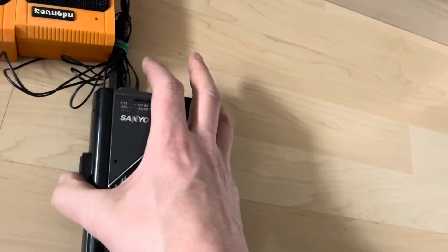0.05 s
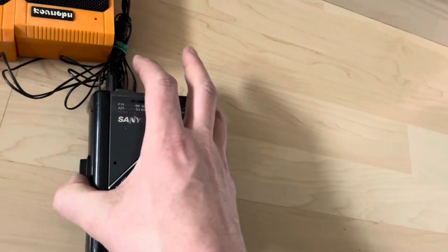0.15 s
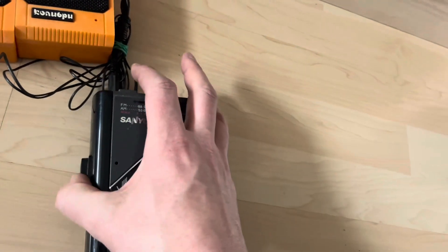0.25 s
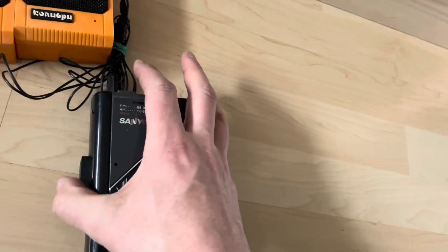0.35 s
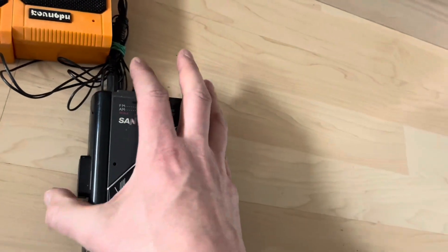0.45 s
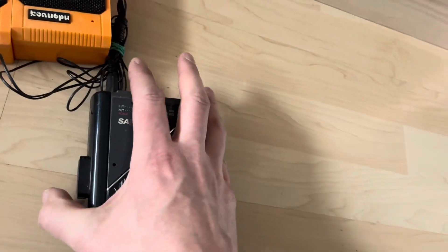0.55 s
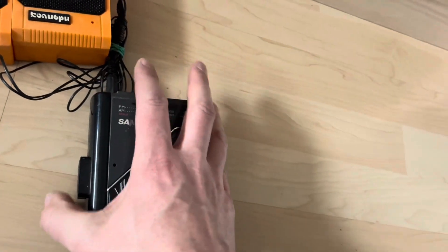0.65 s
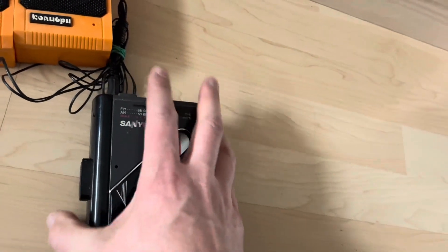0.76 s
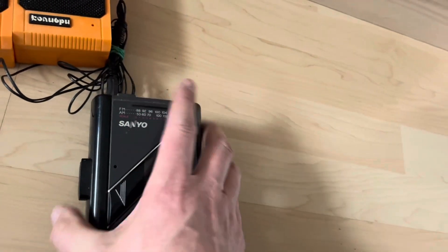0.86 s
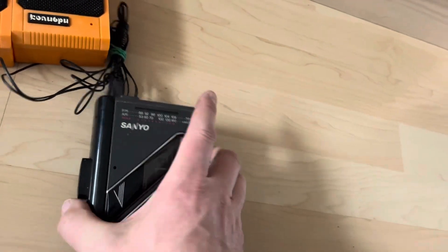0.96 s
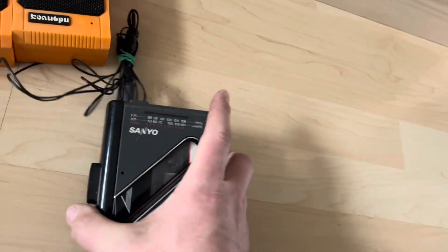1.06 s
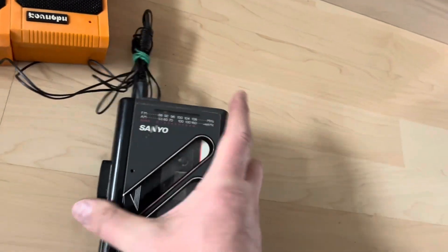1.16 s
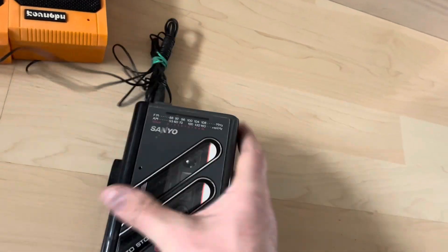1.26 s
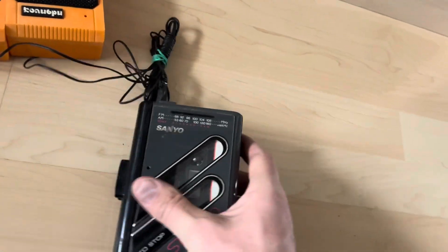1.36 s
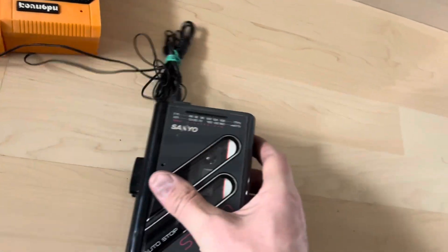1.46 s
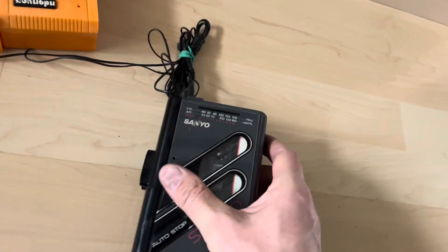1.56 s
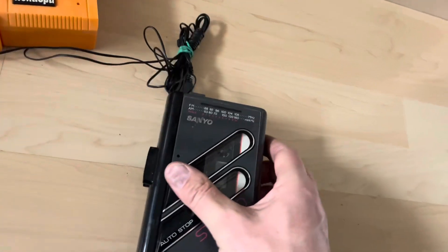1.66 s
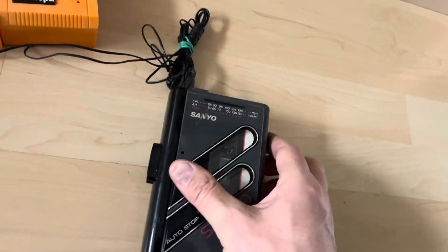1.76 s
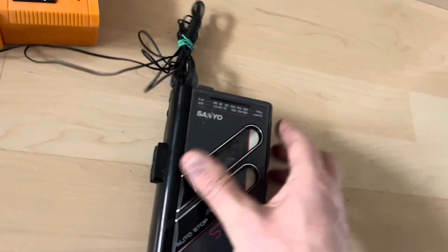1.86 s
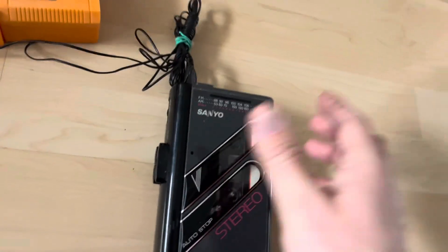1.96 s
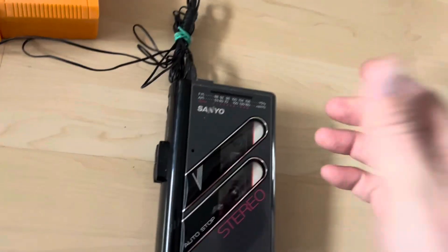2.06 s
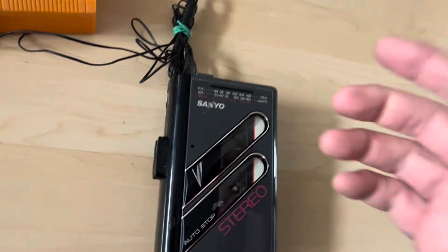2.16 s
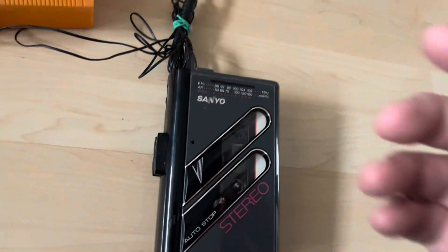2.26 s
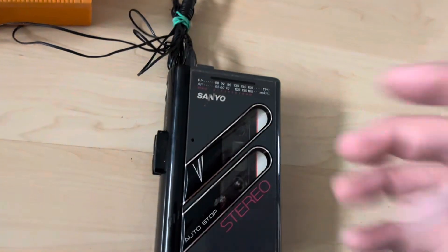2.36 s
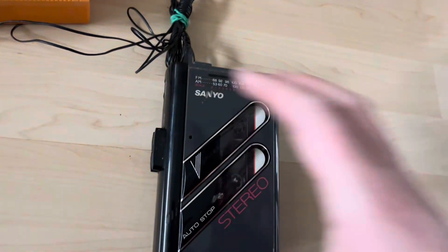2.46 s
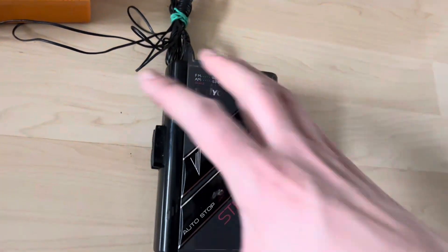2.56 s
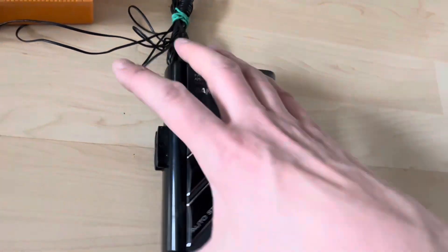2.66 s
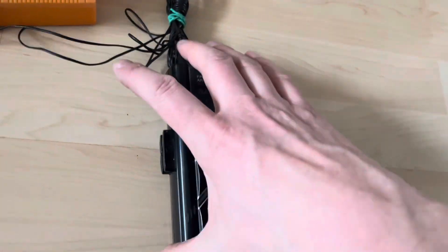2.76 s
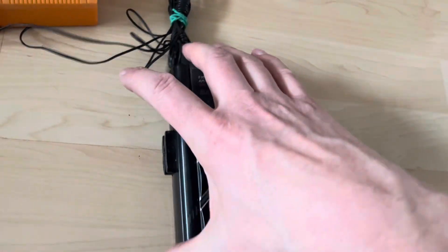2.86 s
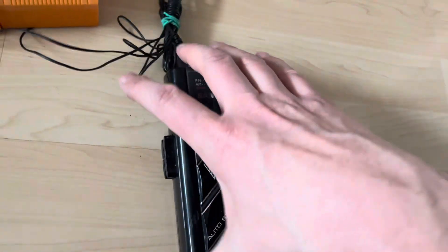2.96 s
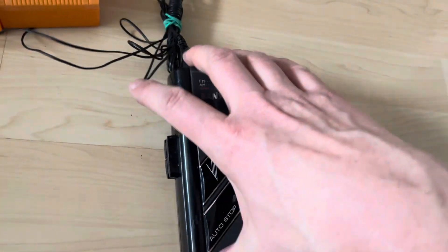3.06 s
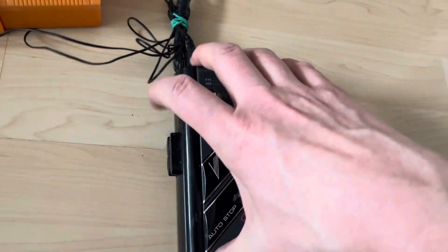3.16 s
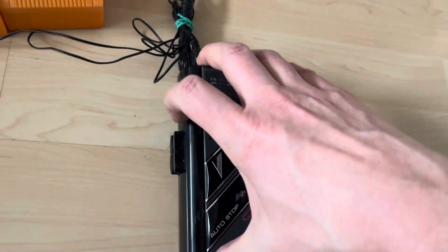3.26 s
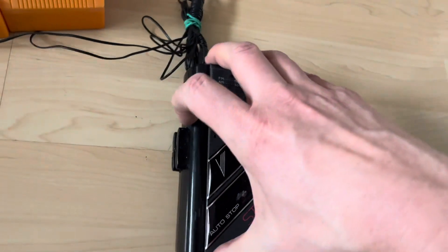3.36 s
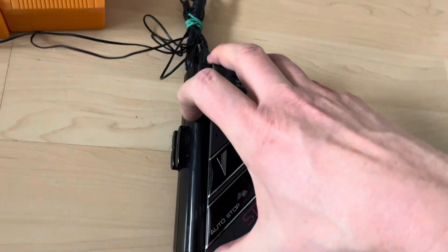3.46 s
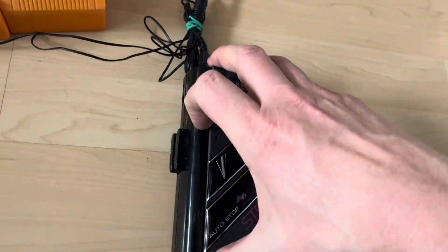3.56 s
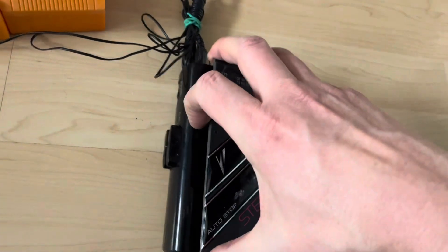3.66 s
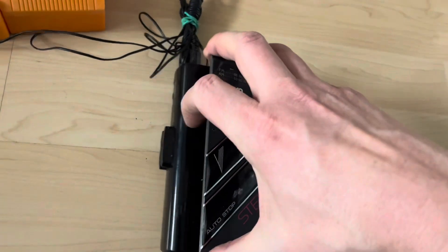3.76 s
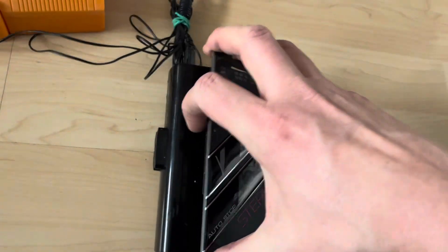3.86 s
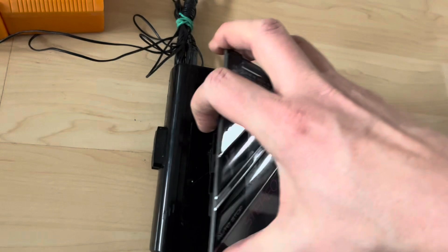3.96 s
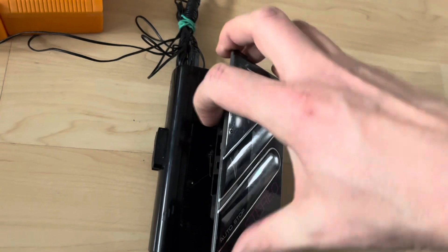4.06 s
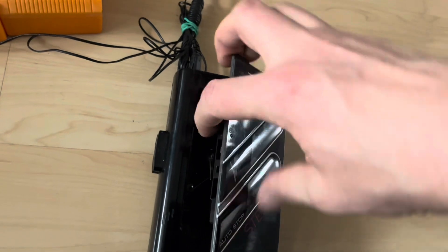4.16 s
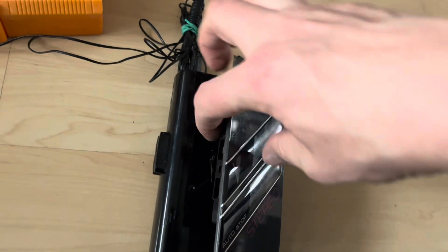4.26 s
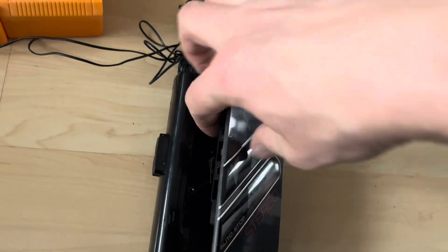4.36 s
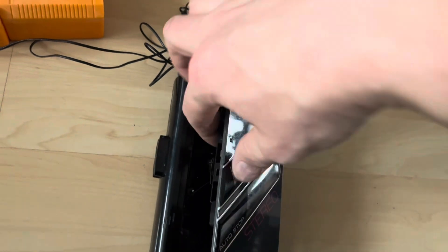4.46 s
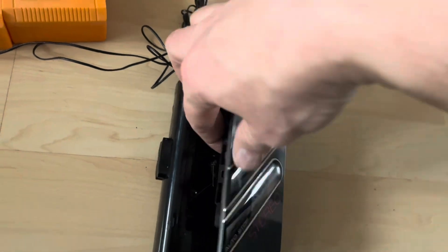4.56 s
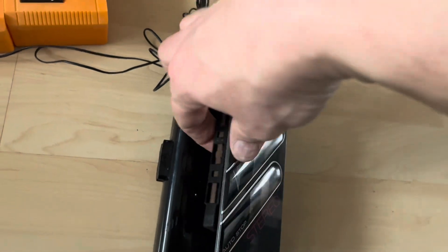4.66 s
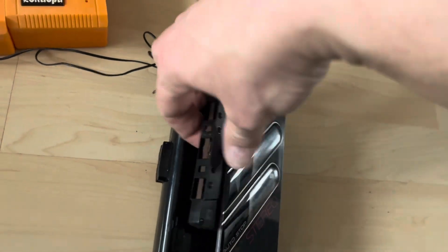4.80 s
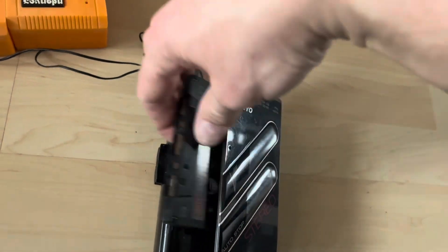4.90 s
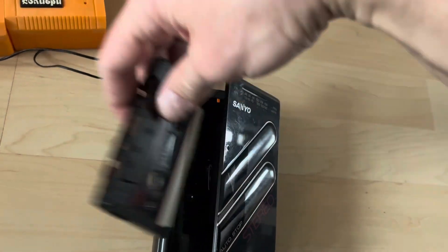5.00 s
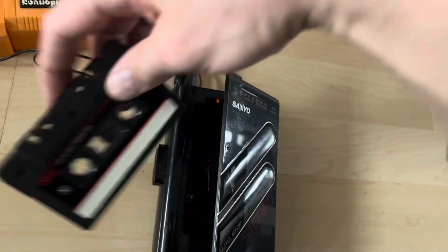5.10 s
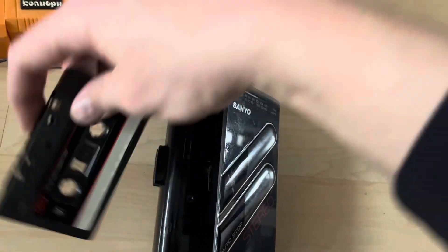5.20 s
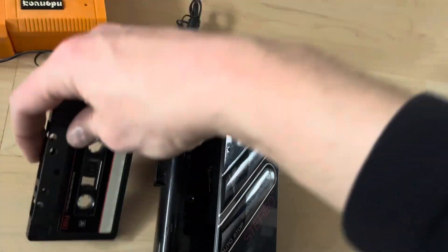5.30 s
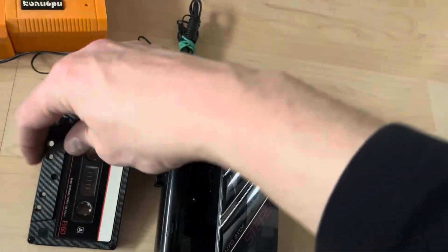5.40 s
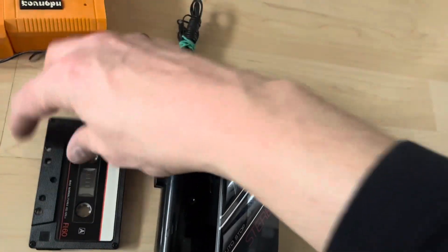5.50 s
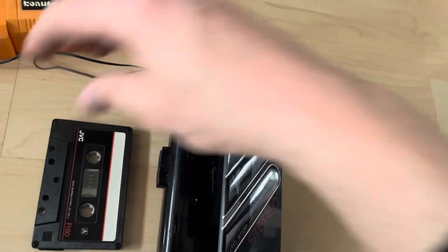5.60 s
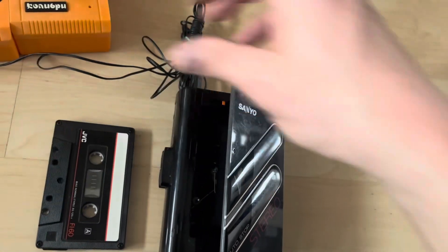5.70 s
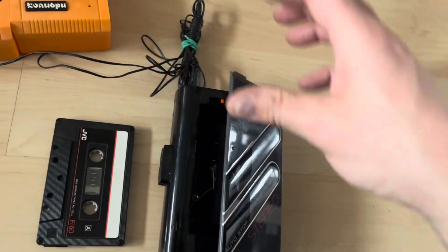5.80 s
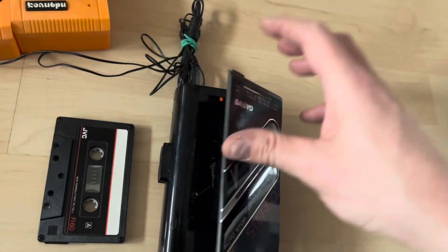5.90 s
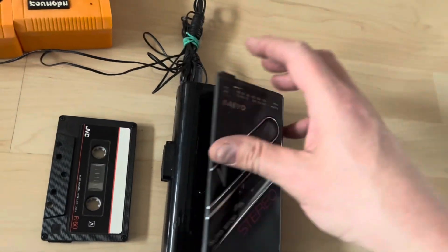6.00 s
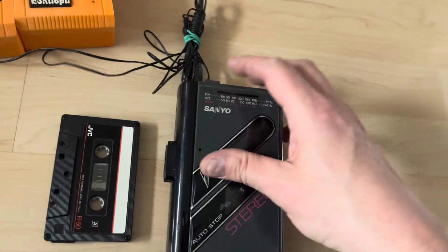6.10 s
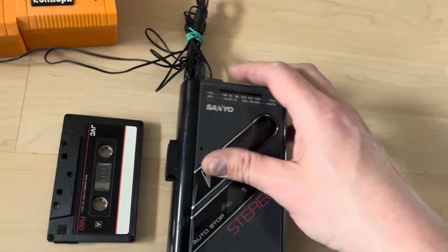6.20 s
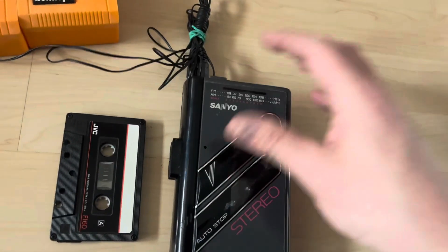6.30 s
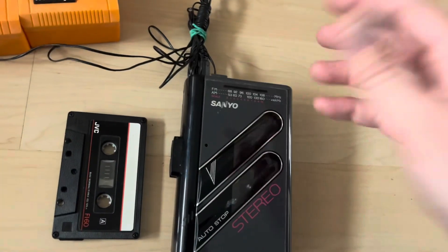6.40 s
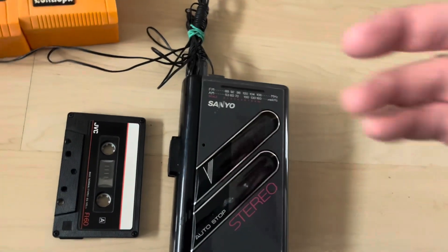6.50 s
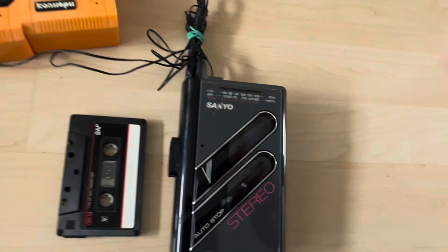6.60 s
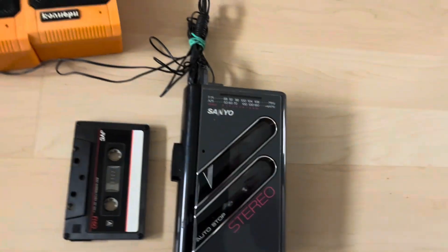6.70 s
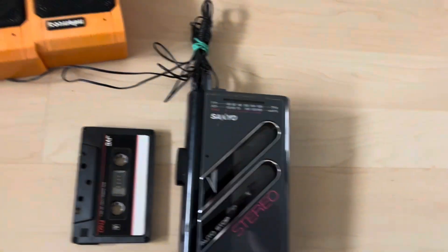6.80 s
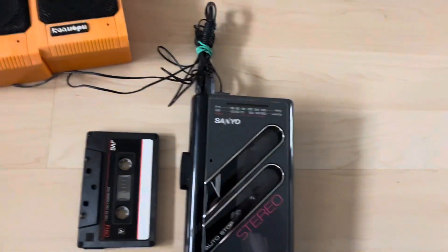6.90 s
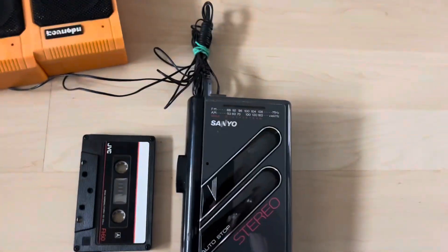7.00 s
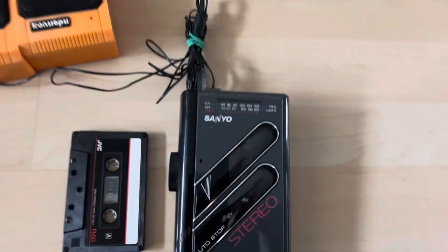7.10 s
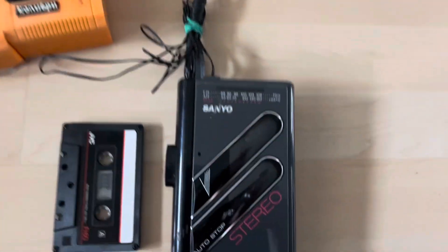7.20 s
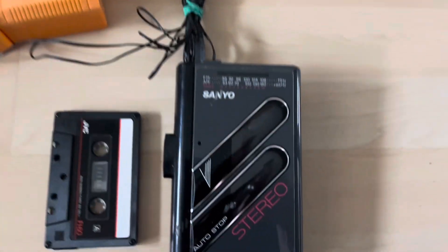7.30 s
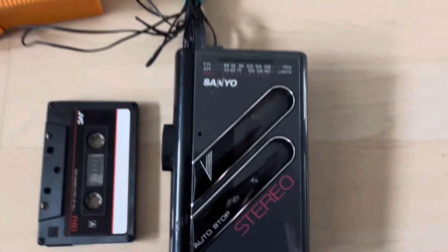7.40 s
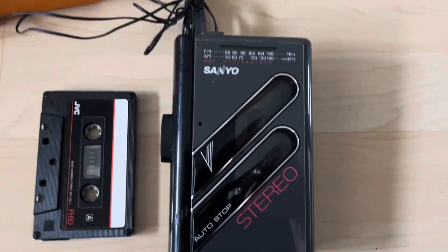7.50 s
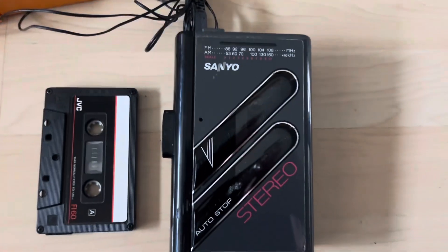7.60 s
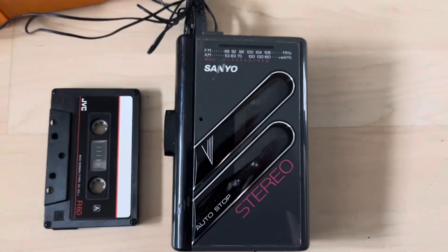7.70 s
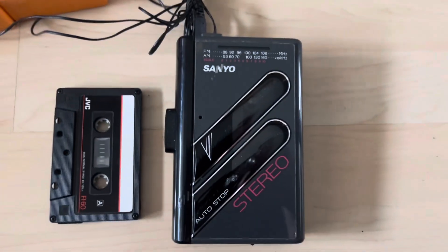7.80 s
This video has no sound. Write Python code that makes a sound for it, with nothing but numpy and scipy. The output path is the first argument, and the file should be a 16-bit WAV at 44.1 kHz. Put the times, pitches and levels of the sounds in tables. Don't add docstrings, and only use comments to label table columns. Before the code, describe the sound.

Hands work a portable cassette player on a floating floor: sparse clicks and short scuffs, soft skin rubbing, then a burst of rattling as the tape is pulled out. It lands with sharp clacks and a deep thump. The door slams loudest of all, settles with small knocks, and gives way to quiet handling rumble and sleeve rustle, heard by a hand-held phone with a short room tail.

```python
import sys
import numpy as np
from scipy import signal
from scipy.fft import rfft, irfft, next_fast_len
from scipy.io import wavfile
from scipy.ndimage import uniform_filter1d

SR = 44100
rng = np.random.default_rng(int(sys.argv[2]) if len(sys.argv) > 2 else 0)


def transcribe(u):
    v = np.clip(np.atleast_2d(u).T, -1, 1)
    q = np.round(v * 32767).astype(np.int16)
    wavfile.write(sys.argv[1], SR, q)


def linear_from_db(decibels):
    return 10 ** (np.asarray(decibels, float) / 20)


N = 346075


def along(table, hz):
    points = np.array(table)
    return np.interp(np.log(hz + 1), np.log(points[:, 0]), points[:, 1])


def colour(x, table):
    size = next_fast_len(len(x))
    gain = linear_from_db(along(table, np.fft.rfftfreq(size, 1 / SR)))
    y = irfft(rfft(x, size) * gain, size)[:len(x)]
    return y / np.sqrt(np.mean(y ** 2))


def noise(table):
    return colour(rng.standard_normal(N), table)


def narrow(hz, share, size):
    skirt = [(hz / 3, -90), (hz * (1 - 3 * share), -40), (hz * (1 - share), -6), (hz, 0),
             (hz * (1 + share), -6), (hz * (1 + 3 * share), -40), (hz * 3, -90)]
    return colour(rng.standard_normal(size), skirt)


def fade(t, t60):
    return np.exp(-np.log(1000) * t / max(t60, 1e-3))


def top(x):
    return x / np.abs(x).max()


def walk(rate):
    k = int(SR / rate)
    held = np.repeat(rng.standard_normal(N // k + 1), k)
    return 1.6 * uniform_filter1d(held, k)[:N]


def add(out, s, sound, early_s=0):
    i = max(int((s - early_s) * SR), 0)
    out[i:i + len(sound)] += sound[:len(out) - i]


def bell(half):
    return np.exp(-np.arange(-3, 3, 1 / SR / half) ** 2)


def swells(peaks):
    out, lead = np.zeros(N + SR), 1
    for s, db, half in peaks:
        add(out, s + lead, linear_from_db(db) * bell(half), early_s=3 * half)
    return out[SR:]


def ring(modes, t, chance, tilt_db=0):
    shift, spot_db = 1 + .02 * chance[:, 1], 2 * chance[:, 0]
    out = 0
    for (hz, db, t60), a, b in zip(modes, spot_db, shift):
        level = linear_from_db(db + a + tilt_db * np.log2(hz / modes[0][0]))
        out = out + level * fade(t, t60) * np.sin(2 * np.pi * hz * b * t)
    return out


# frequency in Hz, density in dB per Hz.
AIR_COLOUR = [(59, -20), (100, 2.5), (1000, -24), (1760, -12), (2470, -27.5), (5000, -40.5), (14100, -68),
              (16000, -75)]


def air():
    return linear_from_db(-68.5 + .7 * walk(4.7)) * noise(AIR_COLOUR)


# frequency in Hz, density in dB per Hz.
HISS_COLOUR = [(3000, -20), (6500, -2), (8000, 0), (12800, -1), (13600, -14), (16000, -30)]


def hiss():
    return linear_from_db(-96) * noise(HISS_COLOUR)


# peak in seconds, level in dB rms, half length in s, centre in
# Hz.
DRONES = [(7.8, -62, 0.07, 300), (7.5, -67, .06, 260), (.2, -68, .1, 600), (1.375, -67, 0.32, 323),
          (3.42, -69, 0.22, 273), (3.9, -70, 1.8, 540), (6.3, -70, 0.3, 520), (5.78, -66, .12, 300),
          (7.6, -64, .15, 190)]
# peak in seconds, level in dB rms, half length in s, centre in Hz.
WHIRS = [(7.42, -80, .1, 2440), (7.66, -74, .07, 1670), (7.54, -76, .04, 1710), (7.46, -73, .04, 1290),
         (7.63, -79, .08, 1250), (7.7, -82, .12, 2430), (7.62, -79, .06, 860), (7.2, -75, .04, 2140),
         (7.17, -77, .05, 1680), (7.27, -77, .05, 1280), (7.33, -78, .08, 1780), (7.77, -78, .04, 1610),
         (3.2, -76, .06, 3350)]
# peak in seconds, level in dB rms, half length in s, centre in Hz.
HINGE = (3.36, -62, .07, 1500)


def drones():
    out, lead = np.zeros(N + 12 * SR), 6
    for rows, share in ((DRONES + [HINGE], .07), (WHIRS, .008)):
        for s, db, half, hz in rows:
            shape = bell(half)
            add(out, s + lead, linear_from_db(db) * shape * narrow(hz, share, len(shape)), early_s=3 * half)
    return out[lead * SR:lead * SR + N]


# time in seconds, level in dB rms.
JERKS = [(0.221, -61), (.88, -60), (1.1, -60), (1.33, -57), (1.87, -51.5), (2.22, -67.5), (2.641, -62.5),
         (2.86, -66), (3.08, -56), (3.57, -56.5), (3.96, -53), (4.18, -62.5), (4.4, -67), (4.73, -56),
         (4.95, -59), (5.281, -63), (5.5, -54), (6.2, -70), (6.419, -51), (6.62, -57.5), (6.801, -55),
         (7.04, -64), (7.481, -61.5), (7.65, -54)]


def handling():
    rumble = noise([(20, -14), (55, 6), (90, 2), (140, -8.5), (300, -17), (500, -64.5)])
    jerk_s, hold_db = 0.094, -65.5
    level = swells((s, db, jerk_s) for s, db in JERKS) + linear_from_db(hold_db)
    return rumble * linear_from_db(1.2 * walk(14)) * level


# time in seconds, peak in dB, pitch in Hz.
GRIP_KNOCKS = [(6.427, -45, 297), (6.493, -50, 260), (6.512, -45, 264), (6.536, -48, 270),
               (6.551, -43, 330), (6.563, -49, 270), (6.609, -47, 325.6), (6.631, -47.5, 411),
               (6.676, -47, 293), (6.701, -42, 272), (6.785, -52, 280), (6.742, -51.5, 289),
               (6.804, -47, 300), (6.875, -51.5, 367), (7.515, -57.5, 648), (7.725, -47.5, 636),
               (7.753, -45.5, 566), (7.775, -40, 545), (7.827, -38, 617)]


def grip():
    out, t = np.zeros(N), np.arange(1000) / SR
    bent = t + .0015 * (1 - fade(t, .014))
    shape = (1 - fade(t, .006)) * fade(t, .013)
    for s, db, hz in GRIP_KNOCKS:
        lower = np.sin(2 * np.pi * hz * bent)
        upper = 270 / hz * np.sin(2 * np.pi * 2.3 * hz * t)
        add(out, s - .001, linear_from_db(db + 6) * shape * (lower + upper))
    return out


# peak in seconds, level in dB rms, half length in s.
SLEEVE_SHIFTS = [
    (7.055, -49, 0.026),
    (7.125, -58, 0.016),
    (7.26, -66.5, 0.084),
    (7.455, -62.5, 0.033),
    (7.62, -70, 0.35),
]
# frequency in Hz, density in dB per Hz.
CLOTH = [(250, -11.5), (650, 9), (1000, -24), (1280, 2), (1480, -19.5), (1720, -2.5), (2300, -12.5),
         (3300, -57)]


def sleeve():
    grains = rng.standard_normal(N) * linear_from_db(2.6 * walk(170))
    return colour(grains, CLOTH) * swells(SLEEVE_SHIFTS)


# peak in seconds, drag on the floor in dB, skin hiss in dB, half length in s.
STROKES = [(0.041, -48.5, -68, 0.12), (0.33, -53.5, -86, 0.098), (0.758, -74.5, -65, 0.11),
           (0.915, -53, -63, 0.081), (1.12, -58.5, -61, 0.091), (1.232, -51, -58, 0.042),
           (1.392, -60.5, -68, 0.12), (1.519, -58.5, -65, 0.058), (1.876, -58.5, -64, 0.056),
           (2.105, -103, -69, 0.28), (2.45, -104, -72, 0.069), (2.725, -57.5, -66, 0.066),
           (3.021, -56.5, -68.5, 0.16), (3.373, -60, -68, 0.13), (3.632, -52.5, -65, 0.08),
           (3.806, -59, -61.5, 0.14), (4.11, -64, -66, 0.16), (4.394, -63.5, -65.5, 0.045),
           (4.654, -41.5, -48, 0.052), (4.814, -48.5, -49, 0.082), (5.072, -61.5, -58.5, 0.14),
           (5.357, -57, -69, 0.073), (5.567, -54, -72.5, 0.087), (5.796, -72.5, -95, 0.16),
           (6.085, -46, -55.5, 0.051), (6.358, -65.5, -68.5, 0.056), (6.568, -70.5, -66.5, 0.17),
           (6.85, -74, -78.5, 0.12), (7.075, -65, -76, 0.07)]
# frequency in Hz, density in dB per Hz.
SKIN = [(1200, -23), (2000, -4), (4400, -2), (6500, -5.5), (10500, -11), (15000, -17), (16000, -51.5)]


def skin():
    waver = linear_from_db(2 * walk(14) + 1.5 * walk(60))
    return noise(SKIN) * waver * swells((s, db, half) for s, _, db, half in STROKES)


def drag_level():
    return swells((s, db, half) for s, db, _, half in STROKES)


# frequency in Hz, density in dB per Hz.
DRAG = [(280, -26.5), (480, -13), (680, 5), (1500, -4.5), (3000, -16), (5000, -44), (9000, -64.5)]


def drag():
    grains = rng.standard_normal(N) * linear_from_db(1.8 * walk(250) + 2 * walk(40))
    boards = linear_from_db(-5) * narrow(150, 0.1, N)
    return (colour(grains, DRAG) + boards) * (drag_level() + linear_from_db(-94.5))


def rub():
    return drag() + skin() + handling()


# frequency in Hz, density in dB per Hz.
GRIT = [(400, -20), (900, 0), (1600, -2), (3500, -10), (7000, -20), (12000, -34)]


def grit():
    per_s, spread_db = 160, 2
    caught = (rng.random(N) < per_s / SR) * linear_from_db(spread_db * rng.exponential(size=N))
    shape = signal.oaconvolve(caught, fade(np.arange(600) / SR, .012))[:N]
    return colour(shape * rng.standard_normal(N), GRIT) * linear_from_db(-8) * drag_level()


# peak
# in seconds, level in dB rms, bright share in dB, half length in s.
SCUFFS = [(0.325, -36, -7, 0.012), (.304, -42, -9, .007), (.292, -47, -14, .004), (1.186, -75, 17, 0.015),
          (1.859, -35, -8.5, 0.0068), (3.645, -50.5, -3, 0.036), (1.189, -50, -13, 0.0062),
          (1.273, -55, -15, 0.019), (4.05, -75.5, 18, .004), (7.056, -85, 15, 0.018),
          (4.641, -24.5, -10.5, 0.0042), (4.782, -38.5, -8, 0.04), (4.871, -38, -5.5, 0.013),
          (5.39, -67, 12, 0.011), (5.495, -44.5, 12.5, 0.0084), (7.452, -92, 15, .025),
          (5.28, -58, -6, .012), (3.078, -62, 4, .006)]
# frequency in Hz, density in dB per Hz.
EDGE = [(2000, -18), (3500, -3), (5500, 2), (9000, -9), (13000, -12), (16000, -26.5), (17000, -53)]


def scuffs():
    grains = rng.standard_normal(N) * linear_from_db(2.3 * walk(400))
    body = colour(grains, DRAG) * swells((s, db, half) for s, db, _, half in SCUFFS)
    bright = swells((s, db + bright_db, half) for s, db, bright_db, half in SCUFFS)
    return body + colour(grains, EDGE) * bright


# peak in seconds, peak level in dB, pitch in Hz.
SLID = [(0.008, -30, 138), (0.058, -31, 151.6), (0.335, -38.5, 150), (0.377, -34, 158),
        (0.424, -33.5, 152.5), (0.843, -35, 156), (0.905, -39.5, 142), (0.978, -34.5, 149),
        (1.115, -44.5, 150), (0.885, -44, 150), (1.155, -40.5, 143), (1.247, -47.5, 144),
        (1.33, -45.5, 170), (1.382, -43.5, 157), (1.463, -22.5, 146), (1.499, -52, 139), (1.616, -30, 150),
        (1.875, -14, 148), (1.921, -19.5, 151), (2.018, -41, 167), (2.108, -44, 172), (2.2, -47, 168),
        (2.279, -54.5, 156)]
# peak in seconds, peak level in dB, pitch in Hz.
TILTED = [(2.633, -47.5, 152), (2.701, -33, 146), (2.918, -16, 146), (2.969, -28, 162),
          (3.017, -35.5, 154.5), (3.123, -31, 145.5), (3.659, -33.5, 155), (3.822, -22, 152),
          (3.855, -31, 161), (3.944, -44, 152), (4.001, -41, 137), (4.202, -46, 156), (4.375, -34, 159),
          (4.397, -27.5, 150), (4.446, -31.5, 132), (4.472, -28.5, 150), (4.502, -58, 147),
          (4.603, -30.5, 151), (4.653, -19, 147.6), (4.761, -34.5, 150), (4.815, -31.5, 157),
          (4.829, -25, 150), (4.847, -27, 144.3), (4.96, -40, 148), (5.049, -48, 165)]
# peak in seconds, peak level in dB, pitch in Hz.
DROPPED = [(5.299, -24, 229), (5.408, -34.5, 230), (5.511, -14.5, 196.4), (5.306, -23, 174),
           (5.509, -20, 330), (6.059, -17, 285), (6.07, -22, 270), (5.358, -42, 165), (5.418, -36.5, 155),
           (5.492, -32, 177), (5.52, -9, 159.4), (5.565, -20, 154), (5.616, -32.5, 153), (5.94, -51.5, 159),
           (6.075, -22.5, 147.5), (6.105, -29, 149), (6.231, -27, 158), (6.265, -29.5, 152.4),
           (6.28, -26.5, 147), (6.359, -36.5, 160), (6.384, -54.5, 150.4), (6.426, -55.5, 145)]


def thumps():
    out, t = np.zeros(N + SR), np.arange(8000) / SR
    for s, db, hz in SLID + TILTED + DROPPED:
        swell = 0.0045 * (150 / hz) ** 2.16
        u = t / swell
        w = 2 * np.pi * hz * t
        turn = 2 * np.pi * rng.random(3)
        main = u ** 0.9 * np.exp(-(u / 2.29) ** 1.27) * np.sin(w + turn[0])
        after = (1 - fade(t, .1)) * fade(t, .16) * np.sin(1.12 * w + turn[1])
        upper = u * np.exp(-u) * np.sin(1.5 * w + turn[2])
        sound = linear_from_db(db + 1.5) * (top(main) + linear_from_db(-14.5) * after + linear_from_db(-6.5) * upper)
        cut = int(SR * max(2 * swell - s, 0))
        add(out, s, sound[cut:], early_s=2 * swell)
    return out[:N]


# frequency in Hz, density in dB per Hz.
BEND = [(120, -12), (250, 1), (500, -1.5), (1500, -2.5), (4000, -13.5)]


def sweeps():
    out, size = np.zeros(N), 4096
    hz = np.fft.rfftfreq(size, 1 / SR)
    lag_s = .005
    phase = -2 * np.pi * lag_s * (2 * np.sqrt(1000 * hz) - hz / 2)
    level = linear_from_db(along(BEND, hz)) / (1 + (hz / 6000) ** 4)
    front = top(irfft(level * np.exp(1j * phase), size))
    for rows, *_, front_db in ACTIONS:
        for s, db, *_ in rows:
            add(out, s, linear_from_db(db + front_db) * front[:size // 2])
    return out


# time in seconds, peak in dB, pitch
# in Hz.
TICKS = [(0.888, -39, 704), (1.081, -49, 1190), (1.186, -39, 727), (1.235, -35, 840), (1.244, -50, 842),
         (1.33, -46, 1570), (2.989, -50, 724), (3.05, -47, 1020), (3.077, -46, 756), (3.107, -45, 721),
         (3.346, -50, 1510), (3.312, -53, 1460), (1.174, -45, 1240), (7.605, -60, 600), (5.97, -56, 1400),
         (3.127, -43, 630), (3.192, -46, 665), (3.257, -49, 719), (3.302, -50, 668), (3.393, -43, 1470),
         (3.525, -46, 850), (3.549, -47, 1280), (3.576, -59, 711), (3.605, -42, 759), (3.877, -43, 1400),
         (3.999, -50, 977), (4.174, -46, 729), (4.728, -37, 778), (4.747, -27, 1140), (4.805, -12, 1070),
         (4.874, -40, 842), (4.949, -39.5, 1570),
         (2.921, -26, 1270), (2.928, -30, 1200), (1.596, -24, 900), (1.602, -29, 1000), (4.638, -17, 2900),
         (4.79, -18, 2700), (4.822, -26, 2800), (5.297, -18.5, 1630), (5.294, -15, 1050),
         (5.2945, -18, 2100), (6.0545, -9, 1150), (5.505, -14, 2000), (6.056, -14, 1000),
         (4.769, -36, 1070), (4.794, -18, 1060), (4.83, -31, 1000), (6.043, -32.5, 1350), (6.09, -27, 686),
         (6.099, -28, 700), (6.228, -35.5, 1250), (6.298, -43, 1495), (6.35, -44, 1300)]


def ticks():
    out, t = np.zeros(N), np.arange(1500) / SR
    for s, db, hz in TICKS:
        modes = [(hz, 0, .016), (hz * 1.23, -5, .016), (hz * 2.1, -6, .007), (hz * 3.4, -12, .004)]
        knock = ring(modes, t, rng.standard_normal((4, 2))) * (1 - fade(t, .003))
        add(out, s, linear_from_db(db - 2) * top(knock))
    return out


# time in seconds, peak in dB.
CRACKS = [(5.5042, -8), (5.2935, -16), (5.5497, -20), (4.8011, -19), (4.6385, -30), (4.5108, -48),
          (4.7602, -40), (4.9373, -45), (4.9643, -33), (4.9867, -31), (5.492, -32), (7.058, -66),
          (7.447, -74), (0.3225, -28), (0.044, -36)]


def cracks():
    out, t = np.zeros(N), np.arange(200) / SR
    for s, db in CRACKS:
        cycle = fade(t, .0012) * np.sin(2 * np.pi * 5200 * t)
        add(out, s, linear_from_db(db) * top(cycle + .4 * fade(t, .004) * rng.standard_normal(len(t))))
    return out


# frequency in Hz, level in dB, t60 in s.
BOX = [(359, -14, .06), (520, -8.5, .06), (658.6, -0.5, .15), (707, -3, 0.15), (1380, -11.5, 0.086)]


def door():
    out, t = np.zeros(N), np.arange(9000) / SR
    body = ring(BOX, t, np.zeros((len(BOX), 2)))
    add(out, 6.0665, linear_from_db(-21) * (1 - fade(t, 0.0029)) * body)
    return out


# time in seconds, level in dB rms, half length in s.
LATCH = (6.0541, -11, 0.0015)


def latch():
    band = signal.butter(2, [8000, 15000], "band", fs=SR, output="sos")
    return signal.sosfilt(band, rng.standard_normal(N)) * swells([LATCH])


# frequency in Hz, level in dB, t60 in s.
HOLLOW = [(533, -14, 0.03), (607, -8.5, 0.0044), (678.3, 0, 0.07), (758, 0.5, 0.04), (865, -3, 0.045),
          (1045, -2, 0.016)]
# frequency in Hz, level in dB, t60 in s.
PANEL = [(1250, 1.5, 0.012), (1495, 2.5, 0.016), (1803, -8.5, 0.0032), (2160, 6, 0.0049),
         (2550, -1.5, 0.0048), (3280, -6, 0.015), (3700, -13.5, 0.0021)]
# frequency in Hz, level in dB, t60 in s.
SHELL = [(1090, -1.5, .012), (1630, 0, 0.013), (2100, -3, .008), (2440, 3, 0.013), (3160, -2, 0.0073),
         (3560, -1, 0.01), (4200, -4.5, .006)]
# frequency in Hz, density in dB per Hz.
BUZZ = [(400, -14.5), (800, 1.5), (2000, -2), (4500, -6), (9000, -15.5), (16000, -26)]
# time in seconds, peak in dB, hollow share in dB, sharp edge in dB.
SHIFTING = [(0.0428, -27, -6, -19), (0.08, -34, 6, -12), (0.2815, -54.5, 17, 0), (0.3225, -18.5, 0, -13),
            (0.4115, -35, -5.5, -49), (0.829, -59.5, 23, -18), (0.8659, -43, -14, -23),
            (0.9109, -37, -19, -37), (0.9337, -50, 10, -25), (0.9618, -34, 6, -57),
            (1.1085, -36.5, -29, -94), (1.2216, -43.5, 10.5, -6), (1.4473, -45.5, 20.5, -3.5),
            (1.4644, -41, 12.5, -12), (1.5893, -21, 0.5, -16), (1.8118, -53.5, 13, -16),
            (1.8632, -22, -36, -43), (1.9042, -20.5, -4, -19), (1.9208, -33.5, -1, -29)]
OPENING = [(2.621, -44.5, 3, -58), (2.6839, -45, 3, -27), (2.7011, -43.5, 10.5, -19),
           (2.8494, -47.5, 6, -39), (2.8994, -15.5, -42, -21), (2.937, -33, -10, -19),
           (2.9577, -30.5, -17, -32), (3.0692, -50, 11, -18), (3.1158, -43, -5, -30),
           (3.238, -63.5, 27.5, -27), (3.4298, -65.5, 25.5, -19), (3.7499, -48.5, 10.5, -15),
           (3.8053, -28.5, -42, -10), (3.9177, -38, -35, -21.5), (4.1905, -39.5, 1.5, -28)]
UNLOADING = [(4.3786, -31.5, -26, -18.5), (4.4302, -37.5, -14, -11.5), (4.4569, -36, -30, -30),
             (4.4828, -54.5, 16, 7.5), (4.4922, -41, -8, -3), (4.5855, -27.5, -1, -16),
             (4.6441, -15, -7, -10), (4.789, -12.5, -13, -18.5), (4.7987, -13.5, -41, -6.5),
             (4.8208, -41, 10, 3), (4.8605, -28, -32, -5.5), (4.9656, -35, -27, 0), (4.9875, -47, -14, 8.5),
             (5.0685, -43.5, -9, -4), (5.1144, -32.5, -34, -17), (5.1261, -37.5, -2.5, -33)]
LAYING = [
    (5.2931, -11, -18.5, -12.5),
    (5.4027, -19, -25, -7.5),
    (5.4792, -26, -3, 2),
    (5.5038, -8, -16, 0),
    (5.5492, -14, -20, -7),
    (5.5724, -23, -20, -5.5),
    (5.5945, -28, -13.5, -10),
]
SHUTTING = [
    (5.8909, -42, -4, -14.5),
    (6.0533, -3, 2, -11.5),
    (6.066, -19.5, 4, -25),
    (6.2098, -40, -12, -14.5),
    (6.2239, -33, -11, -45),
    (6.2536, -29, -6, -39),
]
# contacts, modes that ring, rattle t60 in s, share that keeps buzzing, front in the boards in dB.
ACTIONS = [(SHIFTING, PANEL, 0.029, 0.042, -15), (OPENING, PANEL, 0.029, 0.061, -21.5),
           (UNLOADING, PANEL, 0.03, 0.077, -16.5), (LAYING, SHELL, 0.016, .09, -9.5),
           (SHUTTING, PANEL, 0.012, .04, -13.5)]


def clicks():
    out, t = np.zeros(N), np.arange(4000) / SR
    crack, loose = noise(EDGE), noise(BUZZ)
    for rows, modes, t60, buzz, _ in ACTIONS:
        shape = (1 - fade(t, 4.74 * t60 ** 2)) * (fade(t, t60) + 0.37 * buzz * fade(t, 0.09))
        for s, db, hollow_db, edge_db in rows:
            chance = rng.standard_normal((13, 2))
            knocks = rng.standard_normal(len(t))
            rattle = knocks * np.abs(knocks) * shape
            hollow = signal.fftconvolve(rattle, ring(HOLLOW, t, chance[:6]))[:len(t)]
            struck = ring(modes, t, chance[6:], 0.72 * (edge_db + 18.5))
            panel = signal.fftconvolve(rattle, struck)[:len(t)]
            start = rng.integers(N - len(t))
            part = slice(start, start + len(t))
            edge = crack[part] * shape * (fade(t, 0.081) + 0.18)
            sound = top(panel) + linear_from_db(hollow_db - 2.5) * top(hollow) + linear_from_db(edge_db + 8.5) * top(edge)
            sound += buzz * loose[part] * (1 - fade(t, .02)) * fade(t, .12)
            add(out, s - .0003, sound * linear_from_db(db + 1))
    return signal.sosfilt(signal.butter(3, 430, "high", fs=SR, output="sos"), out)


# band centre in Hz, t60 in s, level in dB.
ROOM = [(171, 0.23, -20.5), (330, .12, -39), (660, 0.11, -42.5), (2100, 0.18, -37.5), (4850, 0.23, -41.5),
        (9500, 0.27, -43), (14000, 0.17, -47)]


def room(x):
    t, out = np.arange(16000) / SR, 0
    place = np.arange(N) // 2200 % 3
    for k in range(3):
        tails = 0
        for hz, t60, db in ROOM:
            band = signal.butter(2, [hz / 1.7, min(hz * 1.7, .45 * SR)], "band", fs=SR, output="sos")
            echoes = signal.sosfilt(band, rng.standard_normal((2, len(t))))
            tails = tails + linear_from_db(db) * echoes * fade(t, t60)
        tails = tails * (1 - fade(t, 0.017))
        out = out + signal.oaconvolve((x * (place == k))[None], tails, axes=1)[:, :N]
    return out


# frequency in Hz, phase in radians.
PORTS = [(170, .15), (320, .6), (850, .8), (1300, -.45), (4500, -1.6), (5300, -3.14), (6000, -4.1),
         (12000, -6.25)]
# frequency in Hz, share as a plain factor.
APART = [(200, 0.05), (600, 0.043), (1500, 0.18), (4000, 0.06), (5300, 0.08), (7000, 0.12), (13000, .3)]


def ports(x, other):
    size = next_fast_len(N + SR // 10)
    hz = np.fft.rfftfreq(size, 1 / SR)
    side = np.array([[1], [-1]])
    both = rfft(x, size) + side * along(APART, hz) * rfft(other, size)
    return irfft(both * np.exp(.5j * side * along(PORTS, hz)), size)[:, :N]


def scene():
    plastic = clicks() + scuffs() + ticks() + door() + cracks()
    boards = thumps() + sweeps()
    tail, tail_apart = room(plastic + linear_from_db(-16.5) * boards)
    background = air() + hiss() + drones() + tail
    front = background + grip() + sleeve() + rub() + grit() + boards + latch() + plastic
    early = np.roll(plastic, 40)
    other = early + rub() + tail_apart + 9.7 * air() + 26 * sleeve()
    return ports(front, other)


def top_cut(x):
    return signal.sosfilt(signal.butter(12, 16800, fs=SR, output="sos"), x)


def record(dry):
    x = signal.sosfilt(signal.butter(2, 45, "high", fs=SR, output="sos"), dry)
    x = signal.sosfilt(signal.ellip(8, .2, 60, 16000, fs=SR, output="sos"), x)
    mix = np.tanh(0.79 * x) * 1.177
    return top_cut(mix)


dry = scene()
out = record(dry)
transcribe(out)
```